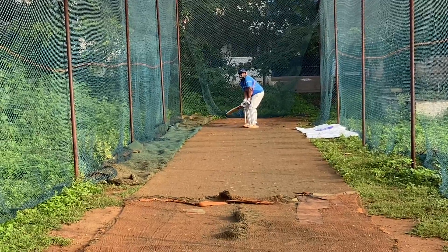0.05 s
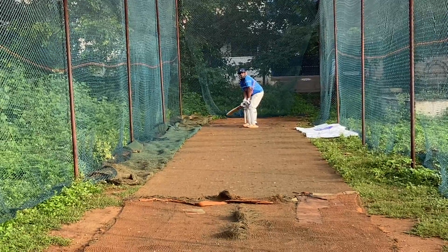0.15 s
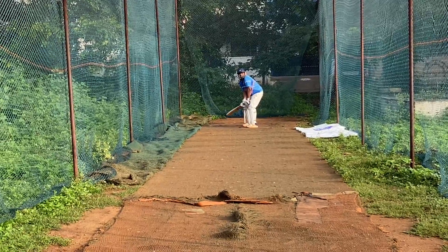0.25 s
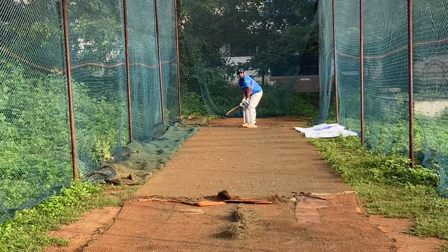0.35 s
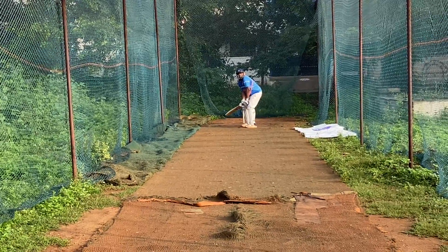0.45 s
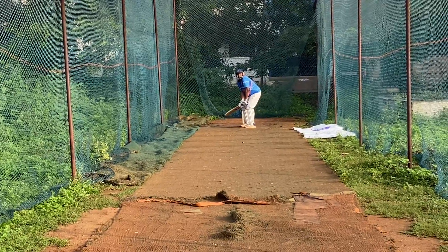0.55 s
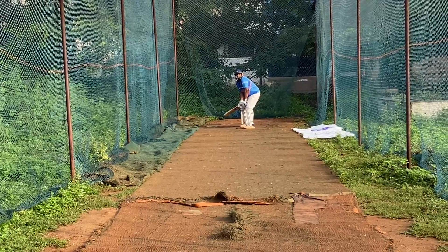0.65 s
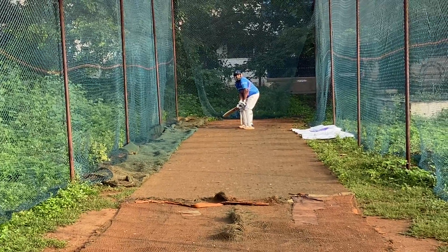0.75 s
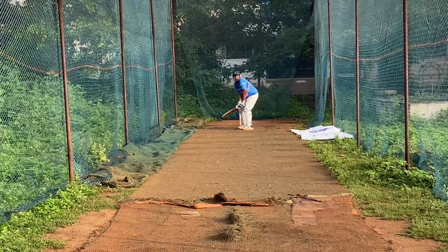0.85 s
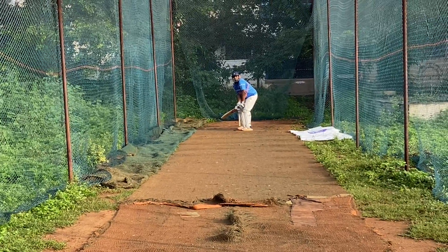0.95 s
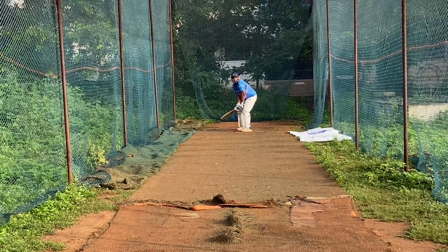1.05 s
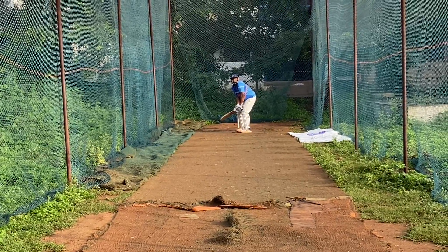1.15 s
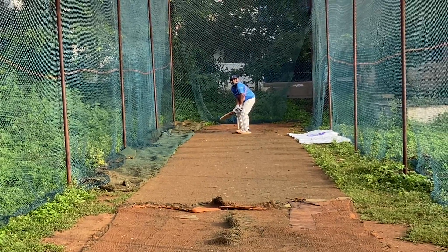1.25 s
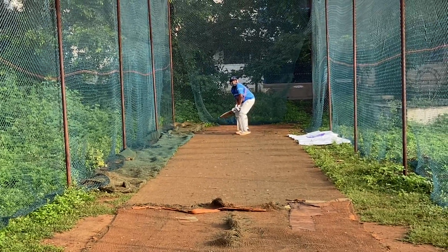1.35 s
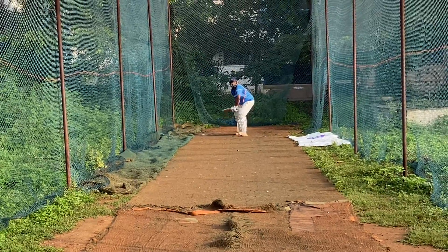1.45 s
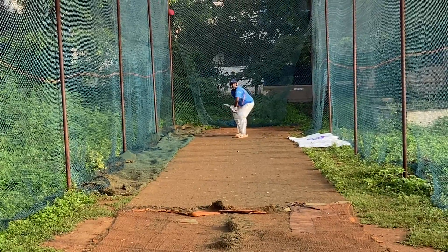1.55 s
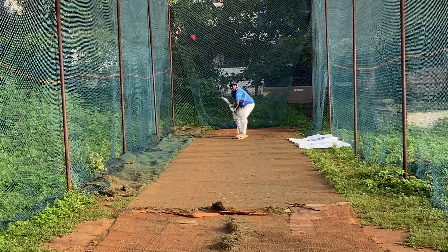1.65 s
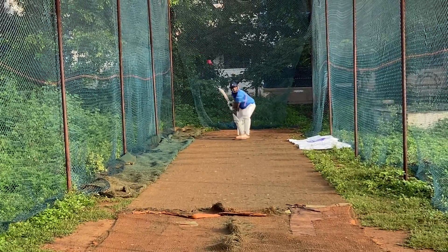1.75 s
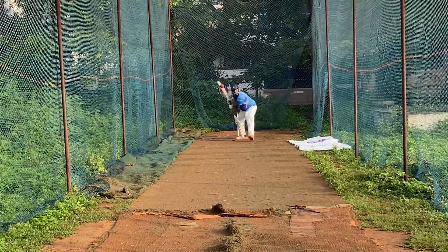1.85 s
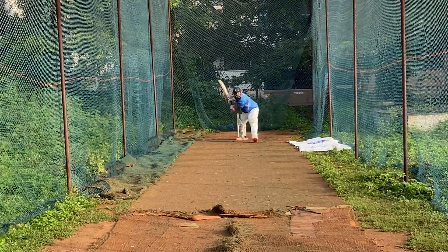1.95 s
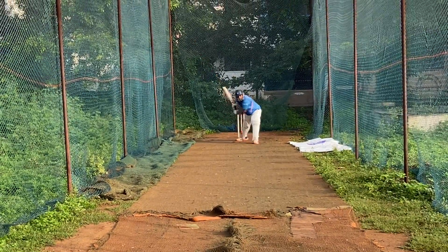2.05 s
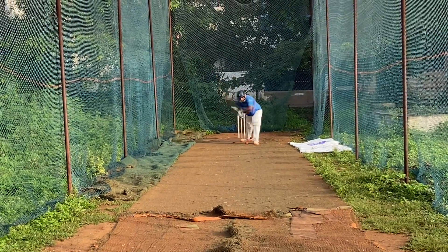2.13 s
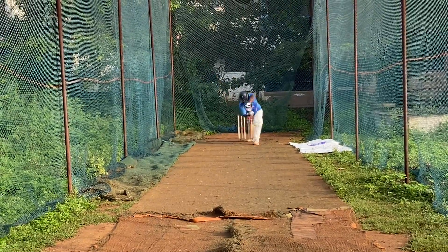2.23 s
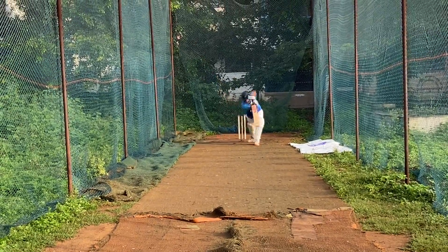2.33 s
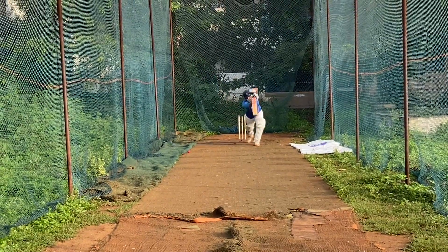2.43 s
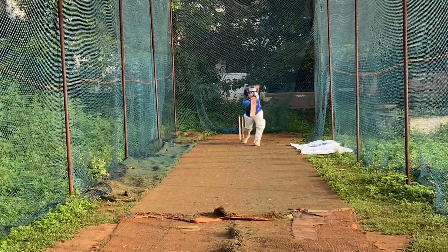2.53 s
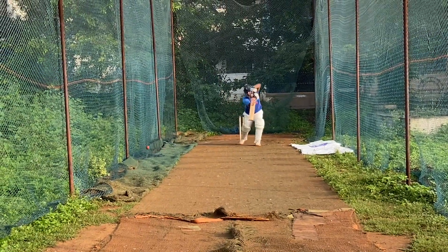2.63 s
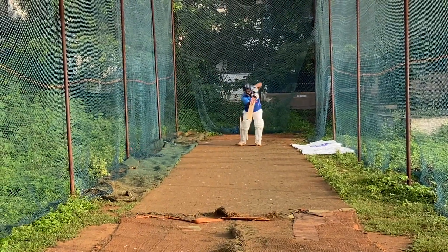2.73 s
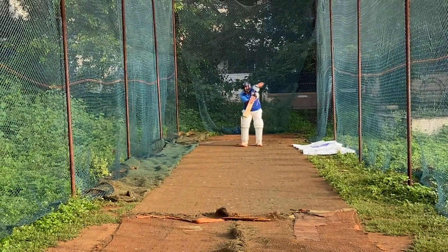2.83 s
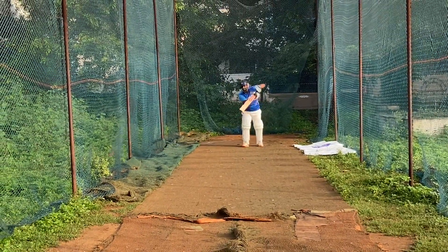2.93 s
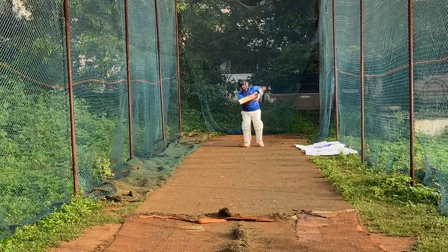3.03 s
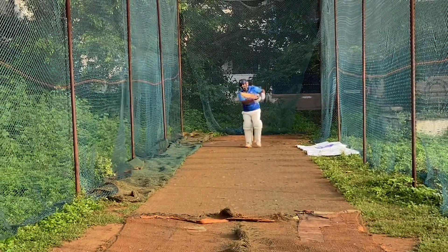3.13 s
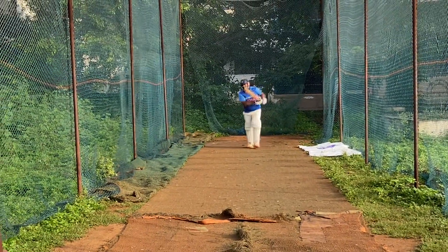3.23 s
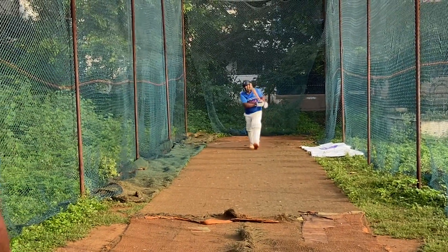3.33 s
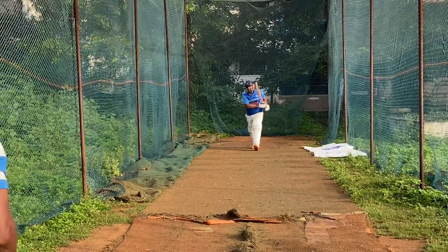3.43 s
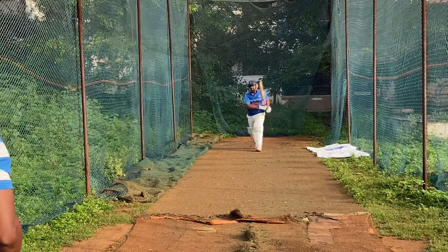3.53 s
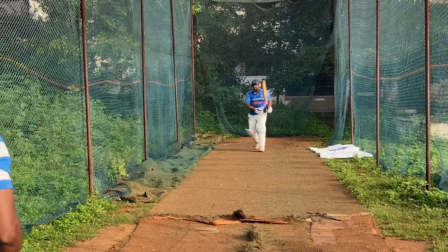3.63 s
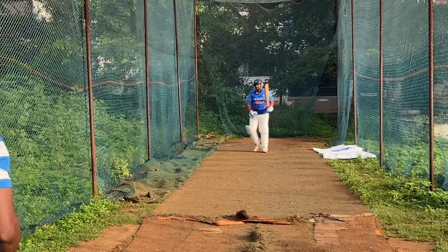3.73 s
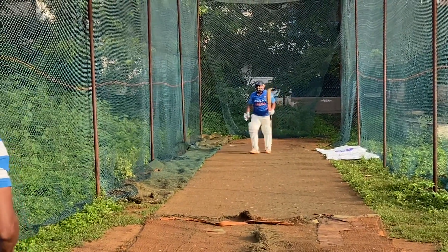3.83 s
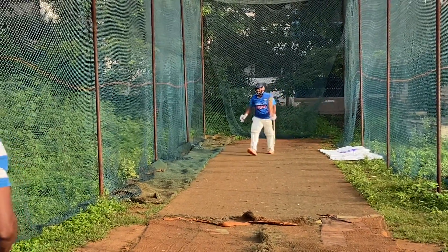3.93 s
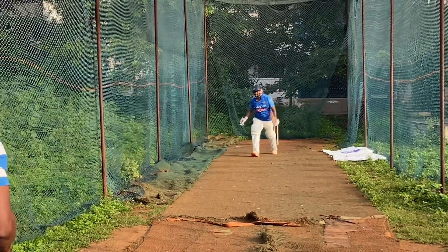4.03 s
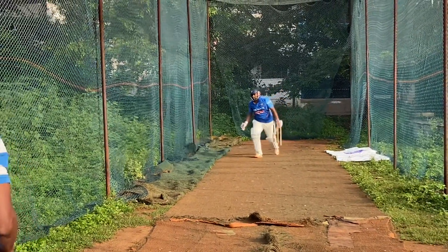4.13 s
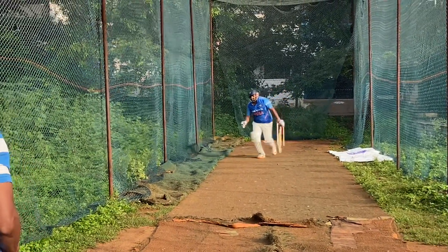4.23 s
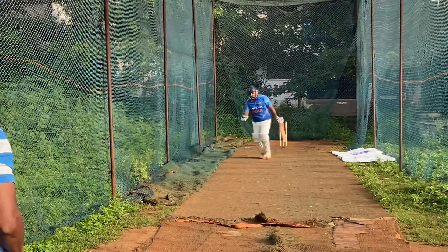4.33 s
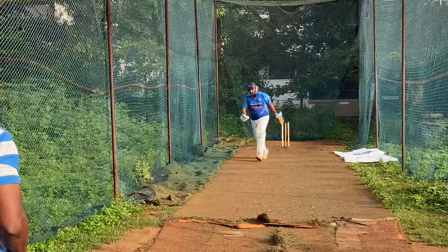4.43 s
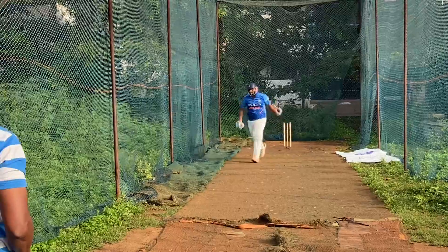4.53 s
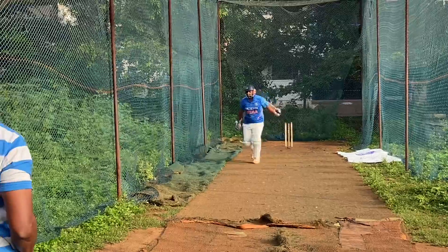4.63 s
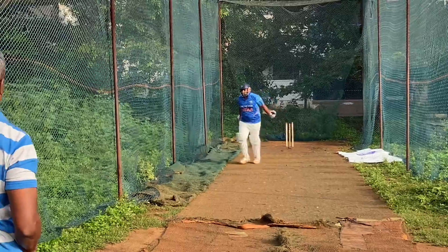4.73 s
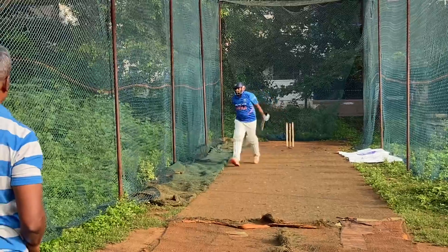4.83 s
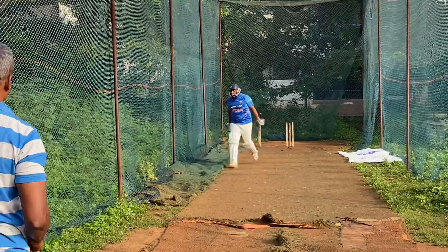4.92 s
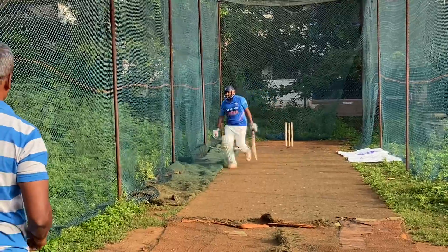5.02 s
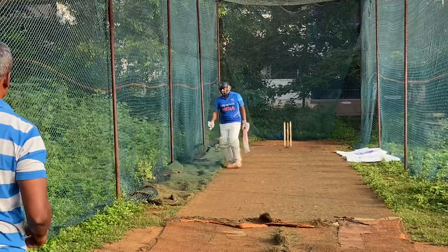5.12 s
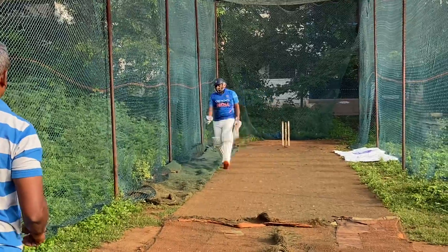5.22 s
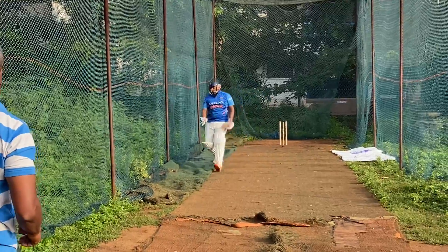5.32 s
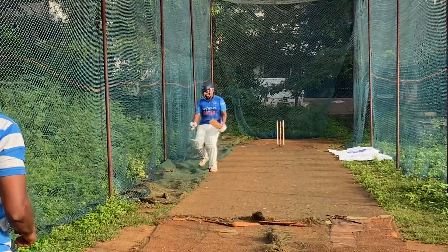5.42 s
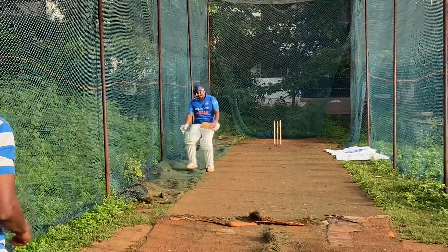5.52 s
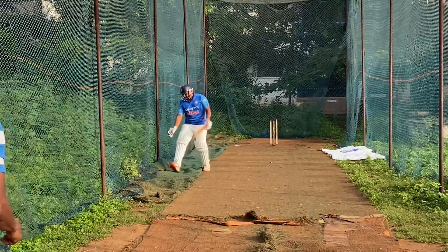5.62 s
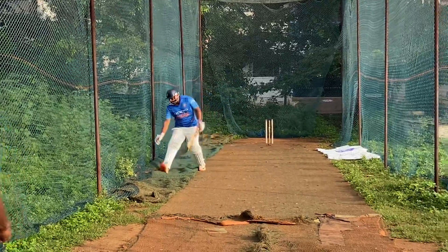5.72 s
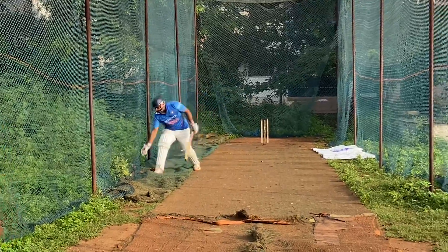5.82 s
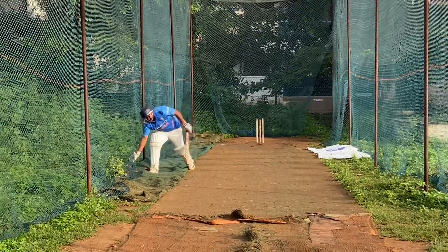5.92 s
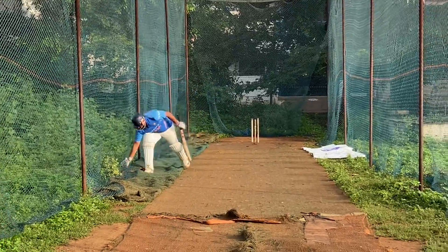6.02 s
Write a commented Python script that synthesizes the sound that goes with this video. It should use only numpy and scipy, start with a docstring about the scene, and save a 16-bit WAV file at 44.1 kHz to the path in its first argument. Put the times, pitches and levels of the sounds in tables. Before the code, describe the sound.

Quiet open-air ambience with rustling leaves, distant traffic, insects and small birds. Gritty footsteps approach a firm thud, then two quick strikes stand out: a woody bounce on the pitch and a brighter, sharper bat hit, with short slaps and a grainy leafy tail. Small net ticks follow; afterwards soft scuffs, lively chirps and a distant knock from another net. Heard in stereo from beside the bowler.

```python
"""Outdoor practice net among trees

Feet scuff the dirt, the front foot lands, the ball knocks on the pitch, the bat cracks it away and it rattles
along the netting: blows are decaying modes plus a splinter of noise, scuffs are shaped grit. Poles and a wall
send slaps back; foliage scatters a grainy tail. Birds (gliding sines) chirp over distant traffic and leaves
(banded noise), far knocks from other nets, insects and thin whines that swell and fade."""
import sys
import numpy as np
from scipy import signal
from scipy.fft import rfft, irfft, next_fast_len
from scipy.io import wavfile
from scipy.ndimage import uniform_filter1d

SR = 44100
rng = np.random.default_rng(int(sys.argv[2]) if len(sys.argv) > 2 else 0)


def bounce(signal):
    """Save signal as a 16-bit WAV file at the path given by the first command-line argument."""
    frames = np.transpose(np.atleast_2d(signal))
    limited = np.clip(frames, -1, 1)
    pcm = np.round(limited * 32767).astype(np.int16)
    wavfile.write(sys.argv[1], SR, pcm)


N = 267687

# Distant traffic and leaves: (frequency [Hz], relative density [dB per Hz])
AIR_SPECTRUM = [(25, -23), (40, -3), (62, 2.5), (120, -4.5), (300, -15), (500, -21.5), (800, -25),
                (1300, -35), (2000, -30.5), (2700, -29.5), (6000, -39), (7000, -44), (9000, -66),
                (11000, -46.5), (13000, -58), (16000, -68)]
# Left-right correlation of the air: (frequency [Hz], likeness [0-1])
AIR_LIKENESS = [(60, 0.97), (130, .95), (300, 0.67), (600, 0), (1500, 0.96)]
# Slow swell of the air, used relative to its mean: (time [s], level [dB])
AIR_SWELL = [(0, -54.5), (1.9, -54), (2.18, -53), (2.4, -51), (3.0, -53), (4.0, -53.5), (4.55, -52.5),
             (5.0, -53.5), (5.71, -55.5), (6.07, -53)]
AIR_DB = -43

# Whine families swelling and fading: (time [s], low family level [dB], high family level [dB])
WHINE_SWELLS = [(0, -76, -84), (.3, -72, -83), (.55, -69, -81), (.9, -71, -84), (1.15, -75, -87),
                (1.4, -71, -80), (1.7, -72, -84), (1.93, -77, -85), (2.1, -71, -85), (2.3, -84, -89),
                (3.2, -82, -83), (3.8, -73, -80), (4.1, -84, -81), (5.1, -84, -82), (5.3, -76, -82),
                (5.65, -82, -85), (5.78, -70, -85), (5.92, -70, -85), (6.07, -78, -85)]
# Members of each family: (frequency [Hz], level over the family [dB])
LOW_WHINES = [(3735, 2)]
HIGH_WHINES = [(8012, .5), (8055, -.5), (9835, -8.5), (12750, -11)]

HUM_HZ, HUM_DB = 1723, -76
INSECT_HZ, INSECT_WIDTH_HZ, INSECT_DB, INSECT_THROB_DB = 5680, 510, -71, 1.5

# Faint chatter deeper in the trees: (start [s], end [s], rate [chirps/s], mean level [dB])
CHATTER = [(0, 2.1, 20, -69), (2.6, 3.8, 30, -67), (3.8, 5.1, 80, -65), (5.1, 6.0, 15, -70)]
# Sliding whistles: (time [s], length [s], first [Hz], middle [Hz], last [Hz], level [dB])
CHIRPS = [(.01, 0.018, 4430, 5030, 5540, -61), (0.02, 0.016, 2450, 2930, 3800, -59),
          (0.028, 0.036, 3800, 3020, 2380, -59.5), (0.323, 0.05, 3330, 3190, 2950, -65),
          (1.438, 0.031, 6200, 5800, 5000, -71), (1.593, 0.042, 2630, 2350, 1900, -59),
          (1.685, 0.13, 2257, 2737, 3730, -55.5), (1.916, 0.022, 4500, 4830, 5230, -59),
          (2.979, 0.033, 2830, 2676, 2360, -53.5), (3.063, 0.015, 2570, 2490, 2310, -60),
          (3.377, 0.047, 2610, 3180, 3500, -62), (3.557, .05, 2875, 2540, 2580, -62),
          (3.75, 0.031, 3300, 2900, 2250, -60.5), (3.853, 0.019, 2100, 2310, 2700, -56),
          (3.864, 0.032, 2490, 3180, 3150, -58), (3.891, 0.079, 2966, 3040, 4090, -52.5),
          (3.988, 0.021, 4270, 4740, 5100, -57.5), (4.008, .012, 4700, 4840, 4750, -61),
          (3.982, 0.043, 2660, 2540, 2400, -59.5), (4.056, 0.02, 2020, 2220, 2290, -61),
          (4.161, .022, 4230, 4130, 2600, -50.5), (4.181, 0.013, 2500, 3220, 2700, -53),
          (4.171, 0.023, 4780, 5260, 5640, -56), (4.22, 0.031, 2220, 3080, 3300, -54),
          (4.229, 0.011, 4300, 4270, 4150, -60), (4.192, .02, 3460, 3830, 4320, -60),
          (4.253, .014, 2600, 2370, 2320, -54), (4.271, 0.013, 2640, 2860, 2350, -52.5),
          (4.352, 0.019, 4560, 4910, 4910, -53.5), (4.413, 0.051, 2826, 3114, 3760, -51),
          (4.435, 0.014, 2100, 2000, 1900, -53), (4.83, 0.012, 1900, 2300, 2600, -53.5),
          (4.318, .03, 3630, 3790, 3950, -56), (4.37, 0.015, 4400, 3960, 4420, -55),
          (2.968, 0.44, 2435, 2400, 2390, -70), (0.273, .035, 5050, 4800, 4500, -70),
          (1.775, 0.042, 4980, 5350, 5550, -66), (4.202, 0.0202, 2730, 2200, 2600, -55.5),
          (4.848, .03, 4180, 3900, 3500, -56), (4.889, 0.015, 2900, 2610, 2280, -53),
          (4.38, 0.027, 5700, 6370, 5900, -57), (4.941, 0.02, 2590, 2700, 2940, -61.5),
          (5.286, 0.029, 2430, 2840, 3270, -57.5), (5.287, 0.038, 3750, 3600, 3000, -56.5),
          (5.276, 0.03, 4280, 4950, 5420, -59.5)]
# Hoarse falling call: (time [s], length [s], first [Hz], middle [Hz], last [Hz], level [dB])
HOARSE_CALLS = [(4.555, .17, 2890, 2650, 2485, -55), (4.73, .06, 2510, 2350, 2190, -60.5)]
# Glide of a short pip: (first [Hz], middle [Hz], last [Hz])
PIP_GLIDE_HZ = (2900, 3120, 3280)
# Pips: (time [s], level [dB])
PIPS = [(1.095, -55.5), (1.534, -61), (2.672, -58), (3.049, -56), (3.47, -61)]
PIP_S = 0.0241
# Rising whistle, often after a pip: (time after its start [s], frequency [Hz], relative level [dB])
RISE_SHAPE = [(0, 3640, -4), (.03, 3820, -1), (.045, 4250, 0), (.056, 4750, -5), (.064, 4900, -6),
              (.09, 4830, -11)]
# Rising whistles: (time [s], level [dB], pitch factor)
RISE_CALLS = [(1.177, -57.5, 0.99), (1.610, -58.5, 0.97), (2.755, -56.5, 0.97), (3.127, -58, .97),
              (3.462, -58, .99)]
# One bird's arched call: (time after its start [s], frequency [Hz], relative level [dB])
ARCH_SHAPE = [(0, 4500, 0), (.007, 3350, 2), (.016, 5200, -4), (0.025, 6000, -1), (.033, 6300, -1),
              (0.040, 5800, -2), (.048, 4200, -3), (0.057, 3000, -6)]
# Arched calls: (time [s], level [dB], pitch factor)
ARCH_CALLS = [(3.626, -49, 1.015), (4.296, -51.5, .99), (4.985, -53, .99)]
FADE_POWER, SHAPED_FADE_POWER, FLUTTER_DB = .35, .12, 2.
CLEAR_RASP, HOARSE_RASP = .08, .7
GROVE_T60_S, GROVE_DB = 0.8, -1.5
TWIGS_T60_S, TWIGS_DB = 0.084, -6  # quick scatter off near branches

# Modes of the far bats: (frequency [Hz], level [dB], t60 [s])
FAR_BAT_MODES = [(622, 9.5, 0.064), (790, 17.5, 0.061), (872, 10, 0.095), (1013, 0.5, 0.16),
                 (1430, -5, .03)]
# Knocks from other nets: (time [s], ring peak [dB], left minus right [dB])
FAR_KNOCKS = [(.363, -47.5, 5), (2.748, -48, 6), (3.203, -40.5, -.6), (3.918, -46, -1.5), (4.691, -32, -1),
              (4.708, -40, 3), (4.719, -40, 2), (4.742, -49, 1)]
FAR_CONTACT_MS, FAR_CRACK_DB = 0.54, -9.5

# Shoes and clothes rubbing: (time of maximum [s], swell [s], fade [s], grit gain [dB], body over grit gain [dB])
SCUFFS = [(.22, 0.21, 0.11, -70, 17.5), (.5, 0.13, 0.031, -68.5, 11.5), (.6, 0.066, 0.13, -75.5, 24.5),
          (.84, 0.061, 0.21, -73, 17.5), (0.944, 0.022, 0.11, -59, 10), (1.055, 0.014, 0.033, -65, 8),
          (1.18, 0.029, 0.016, -64.5, 11), (1.32, 0.12, .12, -61.5, 11), (1.778, 0.091, 0.11, -62, 16),
          (1.85, 0.072, 0.35, -75.5, 12.5), (1.98, 0.039, 0.019, -69.5, 10), (2.8, 0.14, 0.31, -76.5, 22),
          (3.02, 0.12, 0.11, -77.5, 21.5), (3.26, 0.069, 0.026, -81.5, 27), (3.45, 0.17, 0.099, -73, 24),
          (3.66, 0.045, 0.26, -70.5, 16.5), (3.93, 0.055, 0.17, -79.5, 26.5), (4.34, 0.058, 0.12, -70, 6),
          (4.455, 0.028, 0.23, -79.5, 28.5), (4.55, 0.038, 0.13, -79, 18), (4.87, 0.25, 0.095, -80.5, 22.5),
          (5.36, 0.14, 0.12, -72.5, 20), (6.04, .1, .06, -79, 15)]
SCUFF_DEPTH_DB = 15  # drop over one swell or fade time

# Modes of trodden dirt: (frequency [Hz], level [dB], t60 [s])
DIRT_MODES = [(105, -11, .07), (200, -6, .04), (290, -4, .025), (420, -3, .016), (720, 5, .009),
              (1040, -7, .016), (1350, -12, .012), (1945, -4, .011), (2620, -11, .008)]
# Bowler's feet: (time [s], ring peak [dB], contact [ms], crack over ring [dB])
FOOTFALLS = [(0.405, -27.5, 3.1, -21), (0.598, -34.5, 0.32, -28), (.936, -35, 2, -13), (.977, -46, 0.3, 9),
             (1.049, -39.5, .3, 8.5), (1.77, -38, 0.7, 3), (1.8051, -29, 0.42, -8),
             (1.8091, -12, 0.23, -26), (1.843, -30.5, 0.18, -9), (1.8457, -31, 0.14, -4.5),
             (1.852, -34.5, 0.16, -3), (3.408, -33.5, 0.63, -12), (3.429, -28.5, 0.74, -15),
             (3.451, -33, 0.58, -19), (3.471, -31.5, 0.62, -29), (3.502, -39, 0.72, -17),
             (3.650, -35, .6, -13), (3.668, -44, 0.35, -6), (3.678, -38, 0.43, -16), (4.441, -42, 0.24, -4),
             (4.557, -53, .2, 7), (4.835, -40.5, 0.22, -7), (5.345, -40, 0.68, -15)]
# Steps nearly straight ahead: (left minus right [dB], left lag [ms])
STRAIGHT = (0, .09)

# Modes of the side net and its poles: (frequency [Hz], level [dB], t60 [s])
NETTING_MODES = [(432, -6, 0.022), (677, -3, 0.047), (1225, 2, 0.021), (2170, -5, 0.015)]
# Struck ball on the net:
# (time [s], ring peak [dB], contact [ms], crack over ring [dB], left minus right [dB], left lag [ms])
NET_HITS = [(2.298, -47, .3, -16, 0, 0.31), (2.315, -47, 0.27, -12, 0, 0.27),
            (2.333, -34, .25, -12, 0, 0.29), (2.349, -35, 0.23, -12, 0, 0.16),
            (2.372, -36, .3, -10, 0, 0.26), (2.407, -35, 0.26, -17, 0, 0.14),
            (2.4135, -27, 0.27, -23, -.5, 0.075), (2.424, -36, 0.34, -18, 0, .2),
            (2.439, -34, 0.47, -15, 0, 0.17), (2.477, -40, .25, -12, 0, 0.18),
            (2.495, -34, .2, -11, 0, 0.33)]

# Slaps of ball and bat: (delay [s], level [dB], low edge [Hz], high edge [Hz], smear, a third of t60 [ms])
ECHOES = [(.0212, -18, 3800, 13000, .4), (.026, -18, 6000, 12500, 1.)]
# Scattered tail of the knock: (low edge [Hz], high edge [Hz], relative level [dB], t60 [s])
KNOCK_TAIL = [(152, 680, 13.5, 0.7), (450, 970, 12.5, 1.14), (980, 1740, 3, 3), (1995, 2830, 3.5, 0.7)]
# Scattered tail of the crack: (low edge [Hz], high edge [Hz], relative level [dB], t60 [s])
CRACK_TAIL = [(2610, 3300, -16, 0.502), (5000, 12400, 2.5, 0.34)]
KNOCK_GRAIN_DB, CRACK_GRAIN_DB = 2.5, 1
TAIL_CROSSFEED = 0.24  # gain of the opposite side

# Modes of the pitch: (frequency [Hz], level [dB], t60 [s])
PITCH_MODES = [(180, -11, .05), (310, -14, .025), (590, -1, .022), (680, 1, .028), (960, -6, .03),
               (1400, -4.5, .022), (2425, -.5, .018), (3700, 4.5, .007), (4620, -1, .009), (5350, -2, .007),
               (6250, -2, .01)]
# Ball on the pitch, with a small tick before it, a quick slap after and a last faint tick:
# (time [s], ring peak [dB], contact [ms], crack over ring [dB], left minus right [dB], left lag [ms])
PITCH_KNOCKS = [(2.1445, -26.5, .2, -18.5, 0, 0.95), (2.1734, -5.5, .12, -19, -7.5, .6),
                (2.187, -23, .2, -16, -7, 0.76), (2.2269, -30, 0.24, -17, 1, 0.93)]
# Modes of the willow bat: (frequency [Hz], level [dB], t60 [s])
WILLOW_MODES = [(160, -17, .045), (232, -13, .08), (325, -5, .026), (492, -2, .012), (721, 0, .018),
                (1000, -10, .022), (1339, -10, .015), (2232, -12, .011)]
# Bat on ball:
# (time [s], ring peak [dB], contact [ms], crack over ring [dB], left minus right [dB], left lag [ms])
BAT_HITS = [(2.2602, -2, .3, -3, .2, .025)]

MONO_HZ, LEAD_HZ, LEAD_S, TOP_HZ = 1900, 7300, .00026, 15900


def undb(db):
    """Amplitude factor of a level in dB."""
    return 10 ** (np.asarray(db) / 20)


def level(x, db):
    """Scale x to an RMS level in dB."""
    return x * undb(db) / np.sqrt(np.mean(x ** 2))


def band(x, lo_hz, hi_hz):
    """Butterworth band-pass."""
    sos = signal.butter(2, [lo_hz, min(hi_hz, .45 * SR)], "band", fs=SR, output="sos")
    return signal.sosfilt(sos, x)


def noise(size=N):
    """White Gaussian noise."""
    return rng.standard_normal(size)


def walk(rate_hz, size=N):
    """Random levels held 1 / rate_hz s and slewed twice; spread near 1."""
    hold = int(SR / rate_hz)
    steps = np.repeat(noise(size // hold + 1), hold)
    return 1.83 * uniform_filter1d(uniform_filter1d(steps, hold), hold)[:size]


def add(out, x, s):
    """Mix x into out from time s."""
    i = int(s * SR)
    x = x[..., :N - i]
    out[..., i:i + x.shape[-1]] += x


def decay(t60_s, size):
    """A dying burst of noise with energy 1."""
    burst = noise(size) * 1000. ** (-np.arange(size) / SR / t60_s)
    return burst / np.sqrt(np.sum(burst ** 2))


def blows(table, modes, build_ms, choke_ms, low_hz, crack_hz, crack_t60_s, scatter=0., swing=1):
    """A half-sine push rings modes that build, then are stifled; a splinter of noise marks first contact."""
    out, t = np.zeros((2, N)), np.arange(SR // 8) / SR
    hz, db, t60_s = np.transpose(modes)[:, :, None]
    sides = swing ** np.arange(len(modes))[:, None]  # swing -1: neighbouring modes start in opposite directions
    for s, peak_db, contact_ms, crack_db, pan_db, lag_ms in table:
        # scatter: dB in mode level, percent in mode frequency
        level_chance, pitch_chance = rng.standard_normal((2, len(modes), 1))
        mode_hz = hz * (1 + scatter / 100 * pitch_chance)
        gain = sides * undb(db + scatter * level_chance)
        ring = np.sum(gain * np.sin(2 * np.pi * mode_hz * t) * 1000. ** (-t / t60_s), axis=0)
        ring = ring * (1 - np.exp(-1000 * t / build_ms)) ** 2
        ring = ring * np.exp(-(1000 * t / choke_ms) ** 3)
        push = np.sin(np.linspace(0, np.pi, int(contact_ms * SR / 1000) + 3))
        ring = -np.convolve(ring, push)[:len(t)]
        crack = band(band(decay(crack_t60_s, len(t)), low_hz, crack_hz), low_hz / 2, crack_hz)
        blow = ring / abs(ring).max() + undb(crack_db) * crack / abs(crack).max()
        add(out[0], blow * undb(peak_db + pan_db / 2), s + lag_ms / 1000)
        add(out[1], blow * undb(peak_db - pan_db / 2), s)
    return out


def air():
    """Third-octave noise bands swell together and flicker alone; the middle range is unlike left and right."""
    def read(table, hz):
        table_hz, values = np.transpose(table)
        return np.interp(np.log(hz), np.log(table_hz), values)

    out = 0
    for hz in 25 * 2 ** np.arange(0, 9.4, 1 / 3):
        like = np.clip(read(AIR_LIKENESS, hz), 0, 1)
        mid, side = (band(noise(), hz * 2 ** (-1 / 6), hz * 2 ** (1 / 6)) for _ in range(2))
        pair = np.sqrt(1 + like) * mid + np.sqrt(1 - like) * side * np.array([[1], [-1]])
        out = out + undb(read(AIR_SPECTRUM, hz) + 1.39 * walk(6)) * pair
    s, db = np.transpose(AIR_SWELL)
    return level(out, AIR_DB) * undb(np.interp(np.arange(N) / SR, s, db - db.mean()))


def whines():
    """Thin sines swell and fade by family, waver in phase and flutter in level."""
    out, t = np.zeros(N), np.arange(N) / SR
    s, *families = np.transpose(WHINE_SWELLS)
    for family_db, members in zip(families, (LOW_WHINES, HIGH_WHINES)):
        for hz, db in members:
            flutter_db = 0.87 * walk(11) + 1.6 * walk(25)
            tone = np.sin(2 * np.pi * hz * t + 0.5 * walk(30))
            out += np.sqrt(2) * undb(db + np.interp(t, s, family_db) + flutter_db) * tone
    return out


def insects():
    """A narrow throbbing band of hiss in the grass and a faint unsteady hum."""
    hiss = band(noise(), INSECT_HZ - INSECT_WIDTH_HZ / 2, INSECT_HZ + INSECT_WIDTH_HZ / 2)
    hiss = hiss * undb(INSECT_THROB_DB * walk(40) + 1.12 * walk(2.24))
    hum = np.sin(2 * np.pi * HUM_HZ * np.arange(N) / SR + 0.76 * walk(15)) * undb(3.1 * walk(5))
    return level(hiss, INSECT_DB) + level(hum, HUM_DB)


def chatter():
    """Rows like those of CHIRPS, scattered by chance."""
    rows = []
    for start, end, rate, db in CHATTER:
        for when, pitch, size, first, last, loud in rng.random((int((end - start) * rate), 6)):
            hz = 2100 * 2.2 ** pitch
            rows.append((start + when * (end - start), 0.0102 + 0.0201 * size, hz * (.8 + .5 * first), hz,
                         hz * (0.783 + 0.465 * last), db + 9 * (loud - .5)))
    return rows


def whistle(hz, db, power=FADE_POWER, rasp=CLEAR_RASP):
    """A slightly unsteady sine starts and stops quickly and flutters in level."""
    fade = np.sin(np.linspace(0, np.pi, len(hz))) ** power
    fade = fade * undb(FLUTTER_DB * walk(153, size=len(hz)))
    hz = hz * (1 + rasp * uniform_filter1d(noise(len(hz)), size=120))
    return np.sqrt(2) * undb(db) * fade * np.sin(2 * np.pi * np.cumsum(hz) / SR)


def birds():
    """Parabolic glides and two shaped calls ring on among the trees as decaying noise reverberation."""
    out = np.zeros(N)
    pips = [(s, PIP_S, *PIP_GLIDE_HZ, db) for s, db in PIPS]
    for table, rasp in ((pips + CHIRPS + chatter(), CLEAR_RASP), (HOARSE_CALLS, HOARSE_RASP)):
        for s, length_s, first_hz, middle_hz, last_hz, db in table:
            u = np.linspace(-1, 1, int(length_s * SR))
            bend_hz = (first_hz + last_hz) / 2 - middle_hz
            glide_hz = middle_hz + u * (last_hz - first_hz) / 2 + u * u * bend_hz
            add(out, whistle(glide_hz, db, rasp=rasp), s)
    for shape, calls in ((ARCH_SHAPE, ARCH_CALLS), (RISE_SHAPE, RISE_CALLS)):
        s, *curves = np.transpose(shape)
        t = np.arange(0, s[-1], 1 / SR)
        hz, shape_db = (uniform_filter1d(np.interp(t, s, curve), size=90) for curve in curves)
        for start, db, pitch in calls:
            add(out, whistle(pitch * hz, db + shape_db, SHAPED_FADE_POWER), start)
    trees = undb(GROVE_DB) * decay(GROVE_T60_S, SR) + undb(TWIGS_DB) * decay(TWIGS_T60_S, SR)
    return out + signal.fftconvolve(out, trees)[:N]


def far_knocks():
    """Long-ringing knocks with a dull crack come from other nets."""
    rows = [(s, db, FAR_CONTACT_MS, FAR_CRACK_DB, pan_db, 0) for s, db, pan_db in FAR_KNOCKS]
    return blows(rows, FAR_BAT_MODES, build_ms=0.9, choke_ms=90.0, low_hz=690, crack_hz=2480,
                 crack_t60_s=0.11, scatter=1.5)


def scuffs():
    """Dense uneven grit under the soles, with a duller rub that differs left and right."""
    def grains():
        return noise() * undb(3.0 * rng.exponential(size=N) + 1.2 * walk(90))

    grit = level(band(grains(), 2000, 11800), 6.4)
    body = np.array([level(band(band(grains(), 286, 2030), 200, 2900), 0) for _ in range(2)])
    s, swell_s, fade_s, grit_db, body_db = np.transpose(SCUFFS)[:, :, None]
    t = np.arange(0, N / SR, .001)
    away = np.where(t < s, (s - t) / swell_s, (t - s) / fade_s)
    shape = undb(grit_db - SCUFF_DEPTH_DB * away)

    def fine(curves):
        return np.interp(np.arange(N) / SR, t, curves.sum(axis=0))

    return fine(shape) * grit + fine(shape * undb(body_db)) * body


def footfalls():
    """Feet ring the short low modes of the dirt."""
    rows = [(*row, *STRAIGHT) for row in FOOTFALLS]
    return blows(rows, DIRT_MODES, build_ms=0.48, choke_ms=16.0, low_hz=600, crack_hz=7100,
                 crack_t60_s=0.016, scatter=1.)


def net_rattle():
    """The struck ball rattles along the side net and its poles."""
    return blows(NET_HITS, NETTING_MODES, build_ms=0.44, choke_ms=17.0, low_hz=900, crack_hz=3000,
                 crack_t60_s=0.044, scatter=2.0)


def surroundings(dry):
    """Poles and a wall send smeared slaps back; foliage scatters a grainy tail, differently to each side."""
    out = np.zeros((2, N))
    for delay_s, db, lo_hz, hi_hz, smear_ms in ECHOES:
        slap = signal.fftconvolve(dry, decay(3 * smear_ms / 1000, 2048))[:N]
        add(out, undb(db) * band(band(slap, lo_hz, hi_hz), lo_hz, hi_hz), delay_s)
    size = SR // 2
    for s, peak_db, _, crack_db, _, _ in BAT_HITS + PITCH_KNOCKS:
        for table, share_db, wait_s, grain_db in ((KNOCK_TAIL, 0, .006, KNOCK_GRAIN_DB),
                                                  (CRACK_TAIL, crack_db, .004, CRACK_GRAIN_DB)):
            for lo_hz, hi_hz, db, t60_s in table:
                tail = np.array([decay(t60_s, size) * undb(grain_db * walk(157.4, size)) for _ in range(2)])
                tail = tail + TAIL_CROSSFEED * tail[::-1]
                add(out, undb(peak_db + share_db - 3 + db) * band(tail, lo_hz, hi_hz), s + wait_s)
    return out


def pitch_knocks():
    """The ball rings the modes of the pitch, soon stifled by the soil; ticks and a slap share those modes."""
    return blows(PITCH_KNOCKS, PITCH_MODES, build_ms=0.48, choke_ms=12.0, low_hz=2900, crack_hz=7440,
                 crack_t60_s=0.026)


def bat_on_ball():
    """The bat's modes start in alternating directions under a bright crack; hands soon stifle them."""
    return blows(BAT_HITS, WILLOW_MODES, build_ms=.22, choke_ms=15., low_hz=3600, crack_hz=12500,
                 crack_t60_s=.0042, swing=-1)


def scene():
    """Sum of background, bowler, net, ball and bat."""
    background = air() + whines() + insects() + birds() + far_knocks()
    struck = pitch_knocks() + bat_on_ball()
    return background + scuffs() + footfalls() + net_rattle() + surroundings(struck[0]) + struck


def record(dry):
    """Two capsules are stereo in the low range; above, the left mostly feeds both, top treble early on the right."""
    size = next_fast_len(N + 4096)
    hz = np.arange(size // 2 + 1) * SR / size
    left, right = rfft(dry, size) * hz ** 2 / (hz ** 2 + 45 ** 2)  # small capsules lose the deep bass
    own = .1 + .9 / (1 + (hz / MONO_HZ) ** 12)
    lead = np.exp(2j * np.pi * LEAD_S * np.maximum(hz - LEAD_HZ, 0))
    mixed_right = (own * right + (1 - own) * left) * lead
    wet = irfft(np.array([left, mixed_right]), size)[:, :N]
    return signal.sosfilt(signal.ellip(10, .2, 80, TOP_HZ, fs=SR, output="sos"), wet)


dry = scene()
out = record(dry)
bounce(out)
```